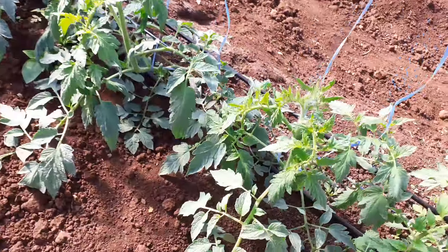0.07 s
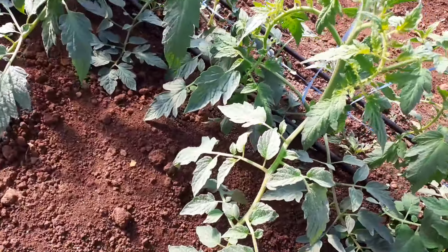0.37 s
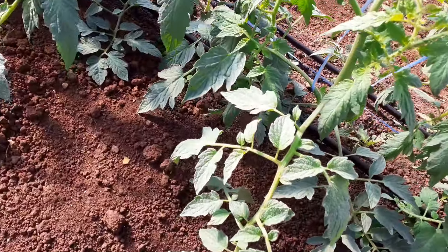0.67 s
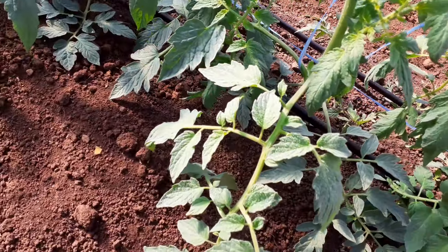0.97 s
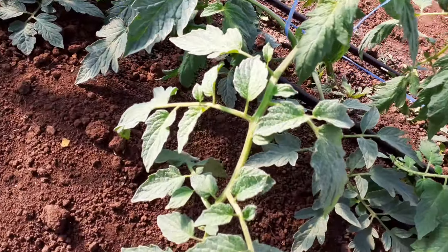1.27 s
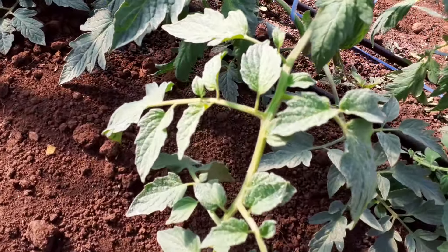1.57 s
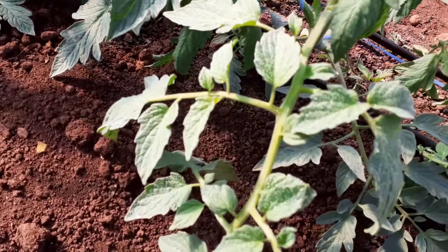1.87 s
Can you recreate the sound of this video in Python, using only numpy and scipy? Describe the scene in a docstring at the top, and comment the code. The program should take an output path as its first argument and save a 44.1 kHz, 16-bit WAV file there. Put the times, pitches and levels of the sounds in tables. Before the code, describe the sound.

A pump engine chugs steadily across a field while water hisses from an irrigation line. The hiss brightens as the microphone moves in on the plants, with a few dry ticks and light handling bumps.

```python
"""A single-cylinder pump engine thuds steadily across a field, its exhaust puffs forming a harmonic series.
Water hisses from a pressurised irrigation line. As the microphone moves in on the plants the hiss
brightens, and interference with its reflection off the soil sweeps a comb of notches slowly through it.
Beneath lie a faint whine and the low wash of the open air. The hand holding the microphone bumps
and rubs it a little, and there are a few dry ticks."""
import sys
import numpy as np
from scipy import signal
from scipy.io import wavfile
from scipy.ndimage import uniform_filter1d

SR = 44100
rng = np.random.default_rng(int(sys.argv[2]) if len(sys.argv) > 2 else 0)


def master_out(mix):
    """Clip the mix to full scale and print it as 16-bit PCM to the path in sys.argv[1]."""
    frames = np.transpose(np.atleast_2d(mix))
    ceiling = np.clip(frames, -1, 1)
    pcm = np.round(ceiling * 32767).astype(np.int16)
    wavfile.write(sys.argv[1], SR, pcm)


N = 176400
T = np.arange(N) / SR
FRAME, HOP = 1024, 256
FRAME_S, BIN_HZ = np.arange(N // HOP + 5) * HOP / SR, np.fft.rfftfreq(FRAME, 1 / SR)

# Open-air background. Each row: frequency in Hz, density in dB per Hz.
AIR_SPECTRUM = [(15, -106), (40, -116), (90, -83), (200, -84), (330, -80), (410, -98.5), (620, -95.5),
                (850, -100), (1040, -93.5), (1130, -82.5), (1220, -92.5), (2000, -102), (5000, -115)]
# Swell of the background. Each row: time in seconds, gain in dB.
AIR_SWELL = [(0, 4.5), (.7, 4), (1.0, 4.5), (1.35, 8.5), (1.7, 1.5), (2.1, 5), (3, 5), (4, 3.5)]
# Its stereo image. Each row: frequency in Hz, coherence, left minus right in dB, right lead in radians.
AIR_IMAGE = [(100, 1, -1.5, 0.052), (348, 1, -2.5, 0.74), (593, 0.55, -6.5, 2.1), (930, 0.69, -2, 1.14),
             (1125, 1, -5.5, 3.1), (2130, 0.97, -23.5, 4.4)]
# Resonances of the rubbed case. Each row: centre in Hz, width in Hz, peak density in dB per Hz.
CASE_RESONANCES = [(306, 43, -64.5), (1226, 40, -74.5), (2370, 50, -76.5)]
# Bumps of the hand. Each row: start in seconds, strength in dB, frequency in Hz.
HAND_BUMPS = [(0.891, -39, 130), (1.018, -31, 111), (1.25, -28, 130), (1.258, -23, 212),
              (1.453, -23.5, 191), (3.187, -35, 218), (3.257, -37, 130)]
# Dry ticks. Each row: start in seconds, strength in dB, left minus right in dB, low and high cutoff in Hz.
DRY_TICKS = [(.3521, -12, -5, 860, 9500), (.7200, -30, -8, 1000, 6000), (1.4690, -15.5, -10, 1690, 3230),
             (2.742, -30, -13, 900, 6000), (3.216, -37, -8, 4000, 15000)]
# Modes of a tick. Each row: frequency in Hz, relative level in dB, time to fall 60 dB in seconds.
TICK_RESONANCES = [(1094, -19.5, 0.004), (2247, -14.5, 0.0052), (3770, -6.5, 0.0024), (4600, -11, 0.004),
                   (5900, -8, 0.0026), (7980, -11.5, 0.012), (11800, -6, 0.0014)]
# Direct and reflected paths of a tick. Each row: delay in seconds, gain.
TICK_PATHS = [(0, 1), (.0008, .25), (.0017, .3), (.0042, .06)]
# Thin tones of the pump. Each row: frequency in Hz, initial level in dB, slope in dB per second.
PUMP_TONES = [(1123, -70, 0.34), (733, -69, -2.5), (415.4, -73.5, 0), (647, -74.5, -.5), (605, -72.5, -1)]
# Jet hiss. Each row: frequency in Hz, then left and right density in dB per Hz for far, midway and near.
JET_SPECTRA = [(900, -91, -90, -104, -130, -108, -100), (1458, -93, -85.5, -95.5, -85, -89, -80.5),
               (1690, -82.5, -83, -91, -84.5, -87, -83.5), (2100, -89.5, -82, -87, -85, -89, -79),
               (2780, -86.5, -85, -91, -85, -85, -81), (3350, -91, -84.5, -92.5, -84.5, -86, -79),
               (4150, -91, -85.5, -94.5, -83, -91.5, -80), (5020, -88, -81.5, -84, -84, -84, -77.5),
               (5560, -92.5, -81.5, -94.5, -79.5, -93, -76.5),
               (7140, -94.5, -81.5, -92, -80.5, -88.5, -78.5), (8400, -93.5, -82, -91, -80.5, -86, -76.5),
               (9450, -100, -94.5, -90.5, -97.5, -93, -89.5), (9900, -100, -108, -96, -99.5, -90, -89.5),
               (11800, -99, -91.5, -92.5, -94, -88, -84), (13900, -102, -98.5, -93, -93, -90, -84.5),
               (16000, -105, -101, -99, -99, -93, -94)]
# Approach to the jet. Each row: time in seconds, nearness (0 far, 0.5 midway, 1 near).
JET_NEARNESS = [(0, -0.079), (.6, 0.048), (1.1, -0.011), (1.7, 0.012), (2.1, 0.58), (2.7, 0.66),
                (3.1, 0.84), (3.6, 0.9), (4, 1.11)]
# Swell of the hiss. Each row: time in seconds, gain in dB.
JET_SWELL = [(0, 0.8), (.25, -1.8), (.5, 1), (1.1, 0.36), (1.5, -.7), (1.85, -.7), (2.2, 0), (3.3, 0),
             (4, -0.5)]
# Treble of the hiss on the left. Each row: time in seconds, gain in dB.
JET_LEFT_TREBLE = [(0, 2), (1.1, -2.5), (1.25, 6.5), (1.8, 4), (2.3, -0.5), (3.0, -2.5), (3.6, -1.5),
                   (4, 0)]
# Lag of the soil reflection. Each row: time in seconds, left and right delay in milliseconds.
SOIL_DELAYS = [(0, 1.4, 1.37), (.6, 1.38, 1.31), (.95, 1.37, 1.305), (1.7, 1.445, 1.385),
               (2.1, 1.515, 1.455), (2.4, 1.497, 1.45), (2.8, 1.54, 1.485), (3.1, 1.515, 1.46),
               (3.5, 1.58, 1.51), (3.75, 1.65, 1.58), (4, 1.65, 1.605)]
# Exhaust note. Each row: multiple of the firing rate, relative level in dB.
EXHAUST_HARMONICS = [(1, -32), (2, -3.5), (3, -22), (4, 3.5), (5, 2), (6, 0.5), (7, 0.5), (8, 0), (9, 0),
                     (10, -23.5), (11, -18.5), (12, -43.5), (13, -24), (14, -25.5), (15, -31), (16, -39),
                     (17, -25), (18, -53), (19, -56), (20, -32), (21, -37.5), (22, -43.5), (23, -107),
                     (24, -87), (25, -40.5), (26, -60)]
# Strength of the engine. Each row: time in seconds, level in dB.
ENGINE_LEVEL = [(0, -45), (.5, -41), (1.0, -41), (2.0, -41), (3.2, -40.5), (4, -41)]


def amp(db):
    """Amplitude grows tenfold for every 20 dB."""
    return 10 ** (np.asarray(db) / 20)


def unit_rms(x):
    """Normalisation to unit mean power."""
    return x / np.sqrt(np.mean(x ** 2) + 1e-20)


def curve(table, t):
    """Linear interpolation of each column in time."""
    s, *columns = np.transpose(table)
    return np.array([np.interp(t, s, c) for c in columns])


def spectrum(table):
    """Linear interpolation of each column in log frequency."""
    hz, *columns = np.transpose(table)
    return np.array([np.interp(np.log(BIN_HZ + 1), np.log(hz), c) for c in columns])


def drift(shape, size):
    """Moving averages, of one size per axis, smooth white noise into a fluctuation of rms 1."""
    x = rng.standard_normal(shape)
    for axis, width in enumerate(size):
        for _ in range(2):
            x = uniform_filter1d(x, width, axis, mode="wrap")
    return unit_rms(x)


def panned(pan_db):
    """A level difference, left minus right, gives a source its direction."""
    return amp(np.array([[pan_db], [-pan_db]]) / 2)


def add(mix, start_s, sound):
    """Superposition of a stereo sound on the mix."""
    part = mix[:, round(start_s * SR):][:, :sound.shape[1]]
    part += sound[:, :part.shape[1]]


def noise(db, coherence, right_lag_rad):
    """Fourier synthesis of partly coherent stereo noise from dB per Hz over frames and bins."""
    a, b, c, d = rng.standard_normal((4, len(FRAME_S), len(BIN_HZ)))
    shared, left = np.clip(coherence, -1, 1), a + 1j * b
    right = (shared * left + np.sqrt(1 - shared ** 2) * (c + 1j * d)) * np.exp(-1j * right_lag_rad)
    spectra = np.array([left, right]) * amp(db) * np.sqrt(SR / HOP * 3 / 8)
    return signal.istft(spectra, nperseg=FRAME, noverlap=FRAME - HOP, time_axis=-2, freq_axis=-1)[1][:, :N]


def open_air():
    """Ambient noise and scattered engine sound merge into a low, partly coherent wash."""
    coherence, pan_db, right_lead_rad = spectrum(AIR_IMAGE)
    db = spectrum(AIR_SPECTRUM) + curve(AIR_SWELL, FRAME_S).T
    return noise(np.array([db + pan_db / 2, db - pan_db / 2]), coherence, -right_lead_rad)


def finger_rub(peak_s=1.25, spread_s=0.057):
    """Friction from a short slide of the fingers excites three resonances of the microphone case."""
    colour = sum(amp(db) * np.exp(-.5 * ((BIN_HZ - hz) / width) ** 2) for hz, width, db in CASE_RESONANCES)
    swell = np.exp(-.5 * ((FRAME_S[:, None] - peak_s) / spread_s) ** 2)
    db = 20 * np.log10(colour * swell + 1e-10)
    return noise(db, coherence=0.32, right_lag_rad=0) * panned(pan_db=-1.5)


def hand_bumps(thud_decay_s=0.0017, knock_hz=444, knock_decay_s=0.00071, band_hz=(53, 850)):
    """Each impact of the hand starts two heavily damped oscillations: a dull thud and a small knock."""
    out, t = np.zeros((2, N)), np.arange(SR // 10) / SR
    knock = amp(-5.5) * np.exp(-t / knock_decay_s) * np.sin(2 * np.pi * knock_hz * t)
    for start_s, db, hz in HAND_BUMPS:
        thud = np.exp(-t / thud_decay_s) * np.sin(2 * np.pi * hz * t)
        add(out, start_s, -amp(db) * (thud + knock) * panned(pan_db=12))
    return signal.sosfilt(signal.butter(2, band_hz, "band", fs=SR, output="sos"), out)


def dry_ticks():
    """Damped modes ring for milliseconds after each snap; nearby surfaces return early reflections."""
    out, t = np.zeros((2, N)), np.arange(SR // 20) / SR
    for start_s, db, pan_db, low_hz, high_hz in DRY_TICKS:
        ring = 0
        for hz, mode_db, t60 in TICK_RESONANCES:
            mode = amp(mode_db - 60 * t / t60) * np.sin(2 * np.pi * hz * t)
            ring += mode / np.hypot(1, (hz / high_hz) ** 3)
        ring = signal.sosfilt(signal.butter(3, low_hz, "high", fs=SR, output="sos"), ring)
        for delay_s, gain in TICK_PATHS:
            add(out, start_s + delay_s, gain * amp(db) * ring * panned(pan_db))
    return out


def pump_whine(waver_hz=2.35):
    """Slight random frequency modulation makes the faint tones of the pump waver."""
    tones = 0
    for hz, db, db_per_s in PUMP_TONES:
        phase = 2 * np.pi * np.cumsum(hz + waver_hz * drift(N, size=[1500])) / SR
        tones += amp(db + db_per_s * T) * np.sin(phase)
    return np.sqrt(2) * tones * panned(pan_db=-3)


def water_jet(treble_hz=8500, soil_gain=.2, leaf_ripple_db=1.5, right_lag_s=0.0002974):
    """The jet's broadband hiss interferes with its soil reflection (a comb filter); leaves ripple it."""
    far, midway, near = spectrum(JET_SPECTRA).reshape(-1, 2, 1, len(BIN_HZ))
    past_midway = 2 * curve(JET_NEARNESS, FRAME_S).T - 1
    db = midway + np.where(past_midway < 0, midway - far, near - midway) * past_midway
    db += curve(JET_SWELL, FRAME_S).T
    db[0] += curve(JET_LEFT_TREBLE, FRAME_S).T / (1 + (treble_hz / (BIN_HZ + 1)) ** 6)
    delay_s = curve(SOIL_DELAYS, FRAME_S)[:, :, None] / 1000
    db += 20 * np.log10(abs(1 + soil_gain * np.exp(2j * np.pi * BIN_HZ * delay_s)))
    db += leaf_ripple_db * drift(db.shape, size=[1, 90, 3])
    db += 0.78 * drift(db.shape[1:], size=[8, 14])  # patches of the spectrum swell and fade
    db += 0.52 * drift((len(FRAME_S), 1), size=[2])  # the whole hiss flickers
    return noise(db, coherence=0.39, right_lag_rad=2 * np.pi * BIN_HZ * right_lag_s)


def pump_engine(firing_hz=29.66, first_firing_s=.0159, wander_s=0.00023, right_lead_s=0.00038):
    """Periodic puffs form a harmonic series, phased as a soft intake gulp and then a push-pull exhaust."""
    intake_lead_s, intake_gain, smear_s_per_hz = .0087, .55, .00002
    clock = T - first_firing_s + wander_s * drift(N, size=[14000]) + np.array([[0], [right_lead_s]])
    harmonics, levels_db = np.transpose(EXHAUST_HARMONICS)
    centroid_hz = firing_hz * np.average(harmonics, weights=amp(2 * levels_db))
    puffs = 0
    for harmonic, db in EXHAUST_HARMONICS:
        hz = harmonic * firing_hz
        stroke_phase = np.angle(1j + intake_gain * np.exp(2j * np.pi * hz * intake_lead_s))
        smear_phase = np.pi * smear_s_per_hz * (hz - centroid_hz) ** 2  # distance spreads each puff
        puffs += amp(db) * np.cos(2 * np.pi * hz * clock + stroke_phase - smear_phase)
    level_db = curve(ENGINE_LEVEL, T) - 0.15 * drift(N, size=[1200])  # slightly uneven firing
    return unit_rms(puffs) * amp(level_db) * panned(pan_db=-2.3)


def scene():
    """By superposition, the pressures of all sources add at the microphone."""
    return pump_engine() + pump_whine() + water_jet() + open_air() + finger_rub() + dry_ticks() + hand_bumps()


def record(dry, cutoff_hz=15850):
    """A linear-phase low-pass filter limits the bandwidth."""
    lowpass = signal.firwin(511, cutoff_hz, window=("kaiser", 9), fs=SR)
    return signal.oaconvolve(dry, lowpass[None], "same")


dry = scene()
out = record(dry)
master_out(out)
```